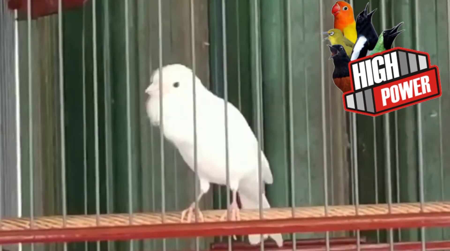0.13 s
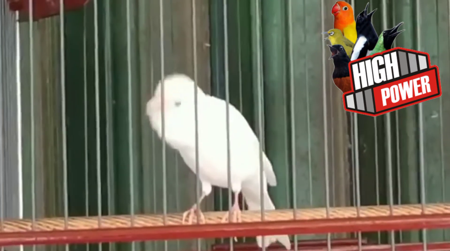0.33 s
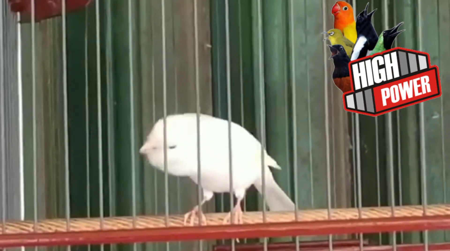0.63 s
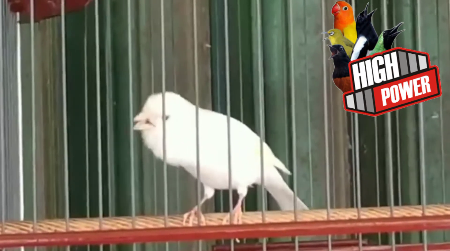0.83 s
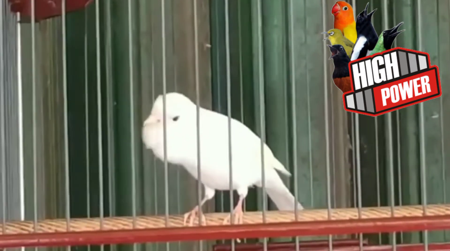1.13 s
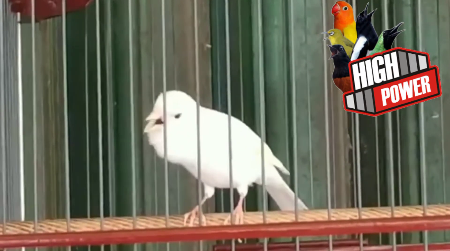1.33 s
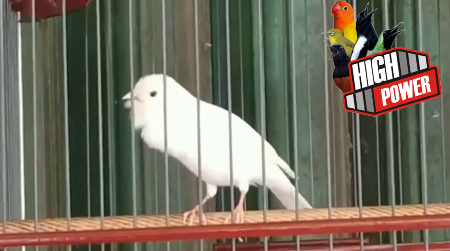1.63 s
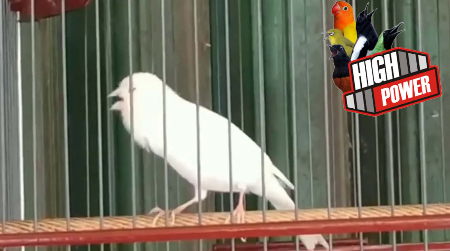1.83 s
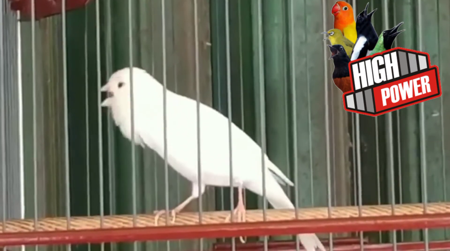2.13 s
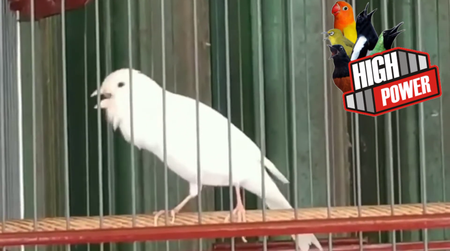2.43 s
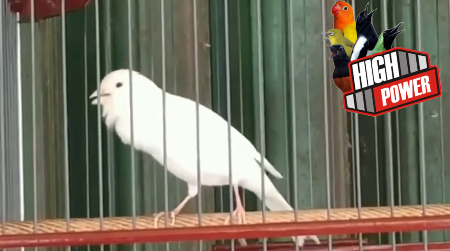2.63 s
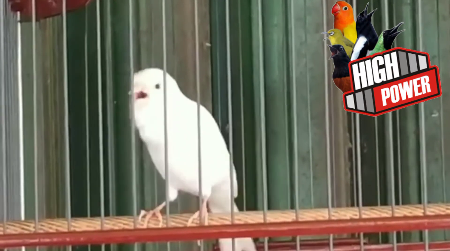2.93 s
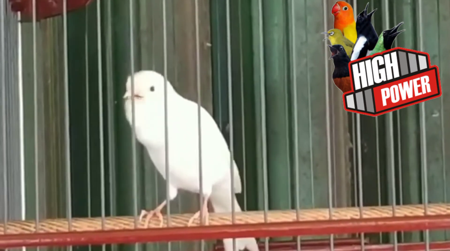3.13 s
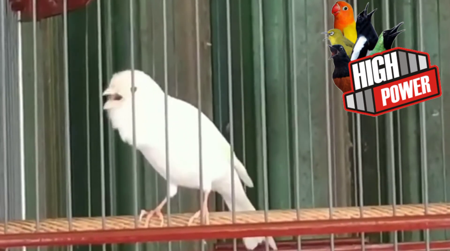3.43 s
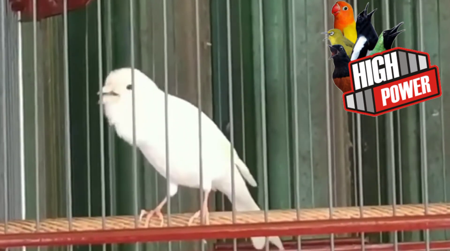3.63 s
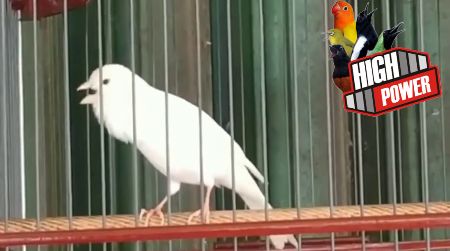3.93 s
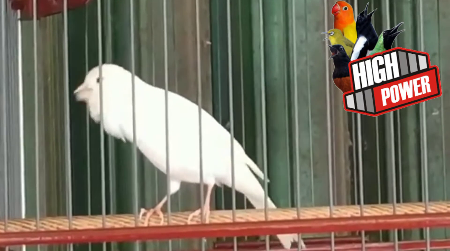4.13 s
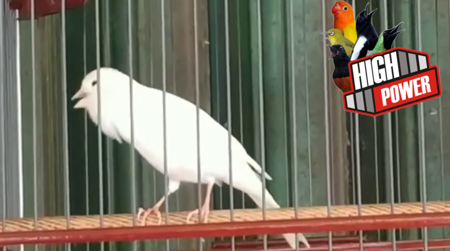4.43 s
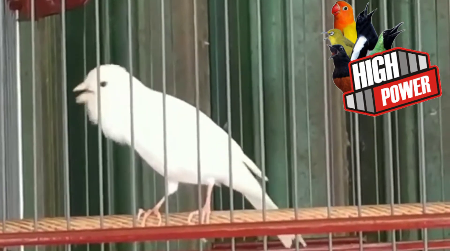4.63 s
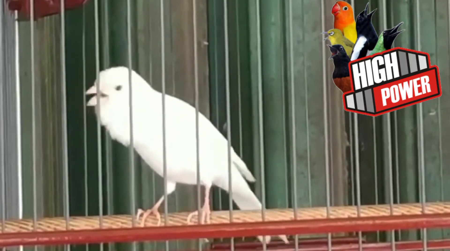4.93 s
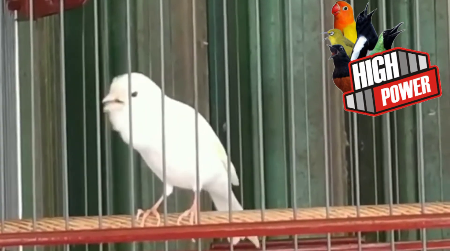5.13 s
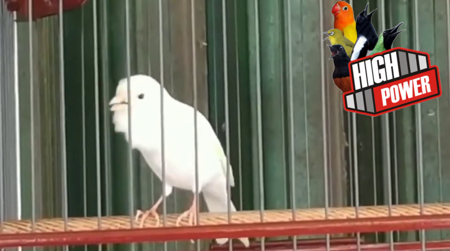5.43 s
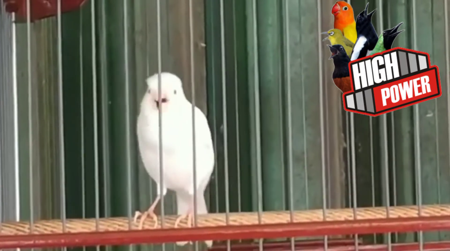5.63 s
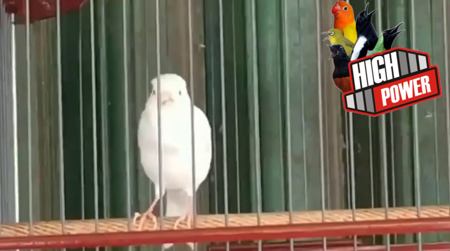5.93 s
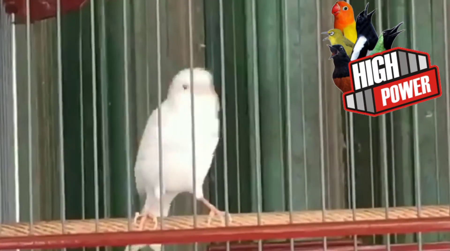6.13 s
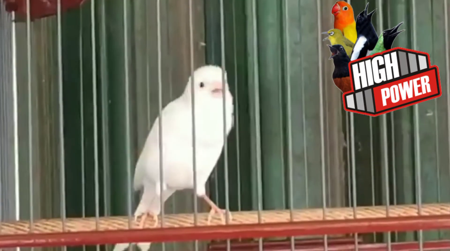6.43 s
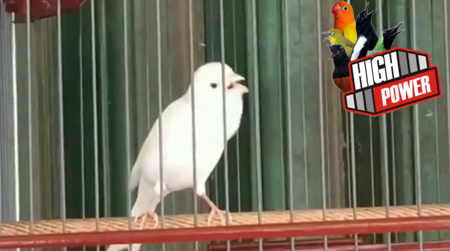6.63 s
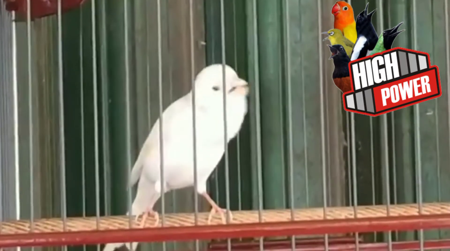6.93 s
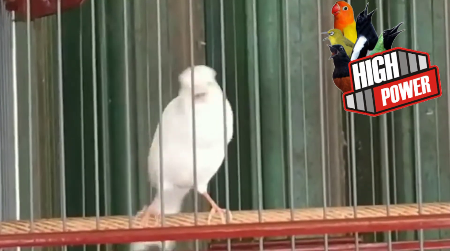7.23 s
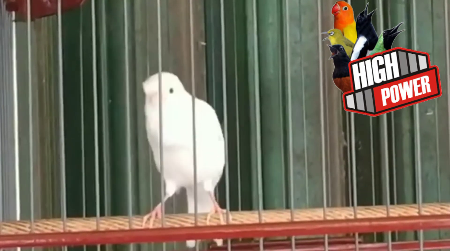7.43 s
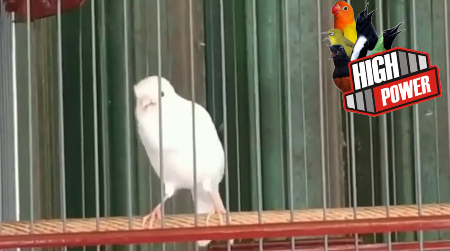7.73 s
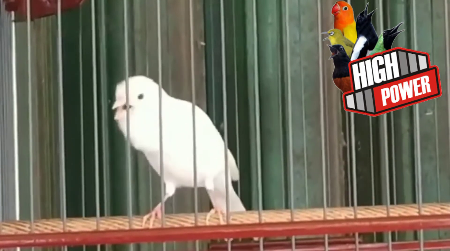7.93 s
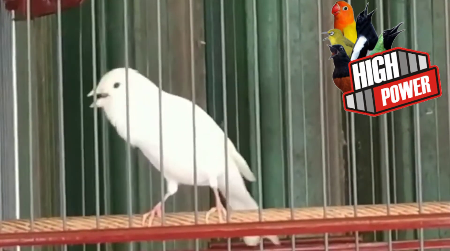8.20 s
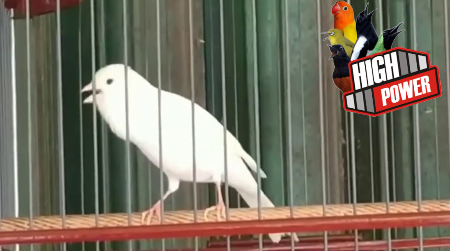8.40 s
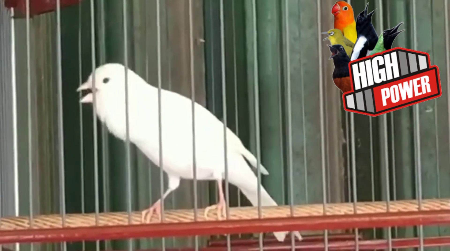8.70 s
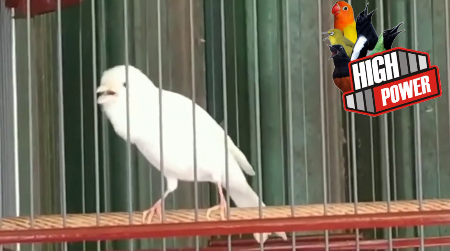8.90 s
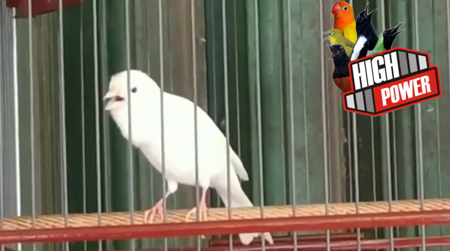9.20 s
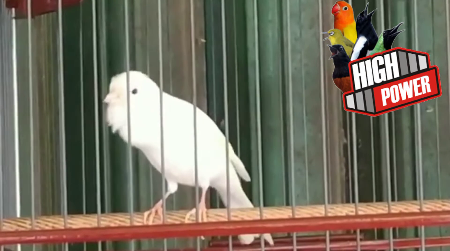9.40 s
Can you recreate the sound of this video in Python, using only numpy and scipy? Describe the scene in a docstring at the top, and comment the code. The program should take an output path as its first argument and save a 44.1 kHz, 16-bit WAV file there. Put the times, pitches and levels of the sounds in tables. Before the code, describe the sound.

A canary sings loudly nonstop close by in a ringing hard-walled room, shifting from falling whistles to buzzy trills and fast chips.

```python
"""Caged canary in a hard-walled room

A canary sings in a wire cage close to two microphones. Its song is a chain of tours: each repeats one syllable,
a nearly pure tone that the syrinx bends in pitch, with overtones and a rasp on rough notes.
Close walls answer each sweep with discrete echoes; decaying noise responses make the room ring on.
A second bird whistles gliding tones further off, over filtered-noise rumble and low engine hums."""
import sys
import numpy as np
from scipy import signal
from scipy.fft import rfft, irfft
from scipy.io import wavfile
from scipy.ndimage import uniform_filter1d, minimum_filter1d

SR = 44100
rng = np.random.default_rng(int(sys.argv[2]) if len(sys.argv) > 2 else 0)


def dump(signal):
    """Clip the signal to [-1, 1] and save it as 16-bit WAV at the path in sys.argv[1]."""
    limited = np.clip(np.atleast_2d(signal).T, -1, 1)
    pcm = np.round(limited * 32767).astype(np.int16)
    wavfile.write(sys.argv[1], SR, pcm)


N = 421596
TIME = np.arange(N) / SR  # s


def undb(db):
    """Decibels to amplitude gain."""
    return 10 ** (np.asarray(db) / 20)


def colour(x, points):
    """Filter by a spectrum of (f/Hz, gain/dB) points, linear in dB over log frequency."""
    hz, db = np.transpose(points)
    bins_hz = np.maximum(np.arange(N // 2 + 1) * SR / N, 1)
    gain = undb(np.interp(np.log(bins_hz), np.log(hz), db))
    return irfft(rfft(x) * gain, N)


def wander(cutoff_hz):
    """Low-passed noise of unit spread: a smooth random curve."""
    lowpass = signal.butter(2, min(cutoff_hz, SR / 4), fs=SR, output="sos")
    x = signal.sosfilt(lowpass, rng.standard_normal(N))
    return x / x.std()


# Rumble and air spectrum, relative: [f/Hz, level/dB]
RUMBLE_SPECTRUM = [(20, -6), (35, 1.5), (70, -1.5), (115, 1), (170, -1.5), (240, -11), (400, -16),
                   (800, -20), (1600, -23), (4000, -17), (13000, -41)]
# Rumble loudness over time, before trim_db: [t/s, level/dB]
RUMBLE_LEVEL = [(0, -38.5), (1.5, -39), (3.8, -39.5), (5.6, -39), (7, -41.5), (8.3, -45), (9.56, -42.5)]


def background(wide_hz=400, trim_db=1.5):
    """Low rumble, alike on both sides, that thins into diffuse air noise above wide_hz."""
    mid = colour(rng.standard_normal(N), RUMBLE_SPECTRUM) * undb(.8 * wander(6))
    side = colour(rng.standard_normal(N), RUMBLE_SPECTRUM)
    highpass = signal.butter(1, wide_hz, "high", fs=SR, output="sos")
    side = signal.sosfilt(highpass, side)
    level_db = np.interp(TIME, *np.transpose(RUMBLE_LEVEL)) + trim_db
    return np.array([mid + side, mid - side]) / mid.std() * undb(level_db)


# Distant engine hums, before waver and drift: [start t/s, length/s, first f/Hz, last f/Hz, level/dB]
ENGINE_HUMS = [(-.1, 0.95, 100.3, 97.7, -38.5), (0.103, 1.15, 112, 121.1, -35.5),
               (1.25, 1.06, 117, 115.8, -37.5), (1.296, 1.3, 58.2, 65.4, -44),
               (3.208, 1.38, 170.4, 168, -39.5), (3.705, 1.236, 83.8, 87.9, -37.5),
               (4.997, 0.99, 149.6, 139.6, -38.5), (6.193, 1.95, 95.9, 98.94, -41.5)]


def engines(waver_db=2.0, drift=0.013):
    """Low gliding sines that swell and fade outside, unsteady in pitch and level."""
    out = np.zeros(N)
    unsteady = 1 + drift * wander(5.1)
    loudness = undb(waver_db * wander(3.4))
    for start, length, first_hz, last_hz, db in ENGINE_HUMS:
        u = np.clip((TIME - start) / length, 0, 1)
        hz = (first_hz + (last_hz - first_hz) * u) * unsteady
        envelope = np.sqrt(np.abs(np.sin(np.pi * u)))
        out += undb(db) * envelope * np.sin(2 * np.pi * np.cumsum(hz) / SR)
    return out * loudness


def room(x, t60_s, db, build_s=.006, treble_hz=6000, treble_share=0.48):
    """Diffuse tail of decaying noise, different at each microphone; the treble dies sooner."""
    t = TIME[:SR]
    noise = rng.standard_normal((2, SR))
    lowpass = signal.butter(2, min(treble_hz, SR / 3), fs=SR, output="sos")
    low = signal.sosfiltfilt(lowpass, noise)
    decay = np.exp(-np.log(1000) * t / t60_s)
    response = low * decay + (noise - low) * decay ** (1 / treble_share)
    response *= 1 - np.exp(-t / build_s)
    response /= np.sqrt(np.sum(response ** 2, axis=1, keepdims=True))  # unit energy
    return undb(db) * signal.fftconvolve(x[None], response, axes=1)[:, :N]


def turning(x, t60_s, db, build_s, count=3):
    """As the bird turns its head it lights different walls: drift between several room responses."""
    shares = np.array([undb(9 * wander(3)) for _ in range(count)])
    shares /= np.sqrt(np.sum(shares ** 2, axis=0))
    return sum(room(x * share, t60_s, db, build_s) for share in shares)


def close_walls(x, echoes, lag_ms, sway_ms=0.1136):
    """Direct sound plus first echoes, whose paths change as the bird sways; they beat against each sweep."""
    out = np.interp(TIME - lag_ms / 1000, TIME, x)
    for ms, db in echoes:
        delay_s = (ms + sway_ms * wander(2)) / 1000
        out += undb(db) * np.interp(TIME - delay_s, TIME, x)
    return out


# Far whistles, before pitch waver: [start t/s, length/s, first f/Hz, last f/Hz, level/dB]
FAR_CALLS = [(2.175, 0.21, 4330, 5080, -19), (3.721, 0.15, 2910, 3476, -29), (3.978, 0.2, 2930, 3450, -30),
             (7.755, 0.16, 3840, 4073, -20.5), (8.004, 0.16, 3450, 3760, -21.5),
             (8.26, 0.16, 3360, 3760, -20.5), (8.433, 0.12, 3655, 2900, -30.5),
             (8.73, 0.16, 3600, 3170, -25), (8.985, 0.18, 4180, 5020, -19)]


def far_bird(waver=0.0199):
    """Soft, slightly unsteady whistles that glide quickly at first and level off."""
    out = np.zeros(N)
    unsteady = 1 + waver * wander(95)
    for start, length, first_hz, last_hz, db in FAR_CALLS:
        span = slice(*np.searchsorted(TIME, [start, start + length]))
        u = (TIME[span] - start) / length
        hz = (last_hz + (first_hz - last_hz) * (1 - u) ** 2) * unsteady[span]
        envelope = np.sqrt(np.abs(np.sin(np.pi * u)))
        out[span] += undb(db) * envelope * np.sin(2 * np.pi * np.cumsum(hz) / SR)
    return out


RASP_FROM_HZ, RASP_SPAN_HZ = 5400, 1190  # the voice turns hoarse across this range
SCATTER_PITCH, SCATTER_DB = .004, 0.16  # syllable-to-syllable spread
# Throat gain by pitch: [f/Hz, level/dB]
THROAT_GAIN = [(1800, -5), (2500, -15.5), (3000, -11), (3400, -4.5), (3850, 0.5), (4300, -2.5), (5200, 1.5),
               (5800, -5), (6500, -9.5), (7500, -12)]


def tour(stroke, beats_s, lengths=1, pitches=1, accents_db=0, db=0, attack_ms=5, release_ms=8, swell_db=0,
         rough=0, rasp=0, slowing_per_s=0, sag_per_s=0, tiring_db_per_s=0):
    """Repeat a stroke on each beat, drifting in length, pitch and effort.

    Returns pitch times pressure, pressure, roughness times pressure."""
    stroke_ms, stroke_hz = np.transpose(stroke)
    chance = rng.standard_normal((len(beats_s), 2))
    into_tour_s = np.asarray(beats_s) - np.mean(beats_s)
    lengths = lengths * (1 + slowing_per_s * into_tour_s)
    pitches = pitches * (1 - sag_per_s * into_tour_s + SCATTER_PITCH * chance[:, 0])
    efforts_db = db + accents_db - tiring_db_per_s * into_tour_s + SCATTER_DB * chance[:, 1]
    controls = np.zeros((3, N))
    for beat, length, pitch, effort_db in zip(beats_s, lengths, pitches, efforts_db):
        span = slice(*np.searchsorted(TIME, beat + length * stroke_ms[[0, -1]] / 1000))
        t_ms = (TIME[span] - beat) * 1000 / length  # stroke time, before stretching
        hz = pitch * np.interp(t_ms, stroke_ms, stroke_hz)
        attack = np.clip((t_ms - stroke_ms[0]) / attack_ms, 0, 1)
        release = np.clip((stroke_ms[-1] - t_ms) / release_ms, 0, 1)
        swell = swell_db * np.linspace(-.5, .5, len(hz))
        throat_db = np.interp(hz, *np.transpose(THROAT_GAIN))
        pressure = attack * release * undb(effort_db + swell + throat_db)
        hoarse = rough + rasp * np.clip((hz - RASP_FROM_HZ) / RASP_SPAN_HZ, 0, 1)
        controls[:, span] += pressure * np.array([hz, np.ones(len(hz)), hoarse])
    return controls


# Slur strokes, hoarse high and cleaner low: [t/ms from beat, f/Hz]
SLUR_HIGH = [(-38, 5800), (-30, 7300), (-6, 5200)]
SLUR_LOW = [(-4, 5150), (27, 3950), (64, 2650), (70, 2100)]
# Slur beats: [t/s]
SLUR_BEATS = [.028, .188, .341, .5, .663, .812, .967]


def slur_tour():
    """Opening slurs: the two sides of the syrinx alternate a hoarse high stroke and a clean low one."""
    high = tour(SLUR_HIGH, SLUR_BEATS, db=-11.5, attack_ms=3.3, release_ms=6.8, rough=0.77)
    low = tour(SLUR_LOW, SLUR_BEATS, db=-6.5, attack_ms=3.6, release_ms=4.6, swell_db=-2.5, rough=.1,
               slowing_per_s=-.15, sag_per_s=0.00497, tiring_db_per_s=0.5)
    return high + low


# Falling stroke: [t/ms from beat, f/Hz]
SWEEP_STROKE = [(-14, 7650), (0, 7480), (32, 7020), (96, 5800), (176, 4170), (192, 3150), (204, 2700)]
# Sweep syllables: [beat t/s, length factor, pitch factor, level/dB]
SWEEP_SYLLABLES = [(1.093, .78, 1.0, -1), (1.333, 0.89, 0.99, -0.5), (1.587, 0.96, .99, -1.7),
                   (1.86, 0.97, 0.98, -1.6), (2.129, 1.048, 0.98, -2.1), (8.482, .97, 0.97, .3),
                   (8.744, 1.05, 0.96, .3), (9.02, 1.057, 0.95, 0.1), (9.305, 1.023, .96, 0.4)]


def sweep_tours():
    """Long falling sweeps in two runs: one syringeal stroke per beat."""
    return tour(SWEEP_STROKE, *np.transpose(SWEEP_SYLLABLES), db=-6.5, attack_ms=5, release_ms=4.7,
                swell_db=-1, rough=0.12)


# Rising stroke: [t/ms from beat, f/Hz]
RISE_STROKE = [(-12.5, 2000), (-1, 2720), (15, 3300), (50.5, 4050), (116, 5080), (140, 5200), (208, 5340)]
# Rise syllables: [beat t/s, length factor]
RISE_SYLLABLES = [(2.431, 1.0), (2.727, 1.06)]


def rise_tour():
    """Slow rises: pitch climbs as pressure swells."""
    return tour(RISE_STROKE, *np.transpose(RISE_SYLLABLES), db=-11.0, attack_ms=12, release_ms=15.4,
                swell_db=9.5, rough=0.0077)


# Up-then-down stroke: [t/ms from beat, f/Hz]
SWOOP_STROKE = [(-2.5, 5500), (4, 7450), (24, 6700), (50.5, 5220), (75, 4170), (111, 3330), (198, 2250)]
# Swoop syllables: [beat t/s, length factor]
SWOOP_SYLLABLES = [(3.007, 0.97), (3.265, .93), (3.507, 0.96), (3.758, 0.99), (4.01, .98), (4.274, 0.97)]


def swoop_tour():
    """Slow swoops: a quick rise into a long fall, raspy at the top."""
    return tour(SWOOP_STROKE, *np.transpose(SWOOP_SYLLABLES), db=-8.5, attack_ms=1.85, release_ms=26,
                swell_db=-2.5, rough=0.037, rasp=0.47)


# Hoarse lead-in, high and low trill strokes: [t/ms from beat, f/Hz]
LEAD_IN_STROKE = [(0, 6200), (10, 7300), (58, 6800), (76, 5230)]
TRILL_HIGH = [(-39, 7450), (-29.5, 6500), (-9.5, 4450)]
TRILL_PIP = [(-4, 3230), (1.5, 3540), (9.5, 3740)]
# Lead-in and trill beats: [t/s]
LEAD_IN_BEATS = [4.526]
TRILL_BEATS = [4.612, 4.691, 4.769, 4.846, 4.921, 4.997, 5.075, 5.155, 5.231, 5.309, 5.388, 5.469, 5.552,
               5.631, 5.715]


def trill_tour():
    """A hoarse note, then fast alternation of a rough high stroke and a clean low pip."""
    lead_in = tour(LEAD_IN_STROKE, LEAD_IN_BEATS, db=-8.0, attack_ms=6.4, release_ms=9.4, swell_db=-1,
                   rough=.8)
    high = tour(TRILL_HIGH, TRILL_BEATS[1:], db=-7, attack_ms=1.1, release_ms=2.9, rough=0.34, rasp=0.09,
                slowing_per_s=.14, tiring_db_per_s=-2.5)
    pip = tour(TRILL_PIP, TRILL_BEATS, db=-1.9, attack_ms=3.84, release_ms=7.4, rough=0.048,
               slowing_per_s=-.15, sag_per_s=0.0353, tiring_db_per_s=0)
    return lead_in + high + pip


# Chip strokes, in order: [t/ms from beat, f/Hz]
CHIP_HIGH = [(-31, 5600), (-24, 7300), (-16, 7150), (-2, 5600)]
CHIP_LOW = [(-2, 5550), (10, 4750), (21, 4150), (27, 3800)]
CHIP_TAIL = [(33, 3400), (40, 2900), (49, 1950)]
# Chip beats: [t/s]
CHIP_BEATS = [5.779, 5.883, 5.994, 6.105, 6.213, 6.324, 6.43, 6.543, 6.651, 6.764, 6.875, 6.984, 7.095]


def chip_tour():
    """Fast chips: a hoarse high stroke, a cleaner fall and a short falling tail."""
    high = tour(CHIP_HIGH, CHIP_BEATS, db=-6, attack_ms=0.89, release_ms=11.6, rough=0.704)
    low = tour(CHIP_LOW, CHIP_BEATS, db=-8.0, attack_ms=4.2, release_ms=6.6, swell_db=-12, rough=0.19,
               slowing_per_s=-.08, sag_per_s=0.01526)
    tail = tour(CHIP_TAIL, CHIP_BEATS, db=-6.5, attack_ms=5.6, release_ms=7.2, rough=0.35)
    return high + low + tail


# Chop strokes: [t/ms from beat, f/Hz]
CHOP_HIGH = [(-38.5, 4600), (-27, 7200), (-17.5, 6600), (-6, 5400)]
CHOP_LOW = [(-12, 5900), (0, 5050), (21, 3700), (35, 2950), (60, 1800)]
# Chop beats: [t/s]
CHOP_BEATS = [7.211, 7.346, 7.486, 7.628, 7.767, 7.909, 8.06, 8.193]


def chop_tour():
    """Chops: a hoarse high stroke runs into a cleaner fall that weakens."""
    high = tour(CHOP_HIGH, CHOP_BEATS, db=-12.5, attack_ms=3.6, release_ms=5.4, rough=0.734)
    low = tour(CHOP_LOW, CHOP_BEATS, db=-8.5, attack_ms=10.7, release_ms=23.6, swell_db=-10, rough=0.18,
               rasp=0.21, sag_per_s=0.01102, tiring_db_per_s=2.5)
    return high + low


# Link stroke: [t/ms from beat, f/Hz]
LINK_STROKE = [(-8.5, 6800), (0.5, 8300), (24, 6650), (45.5, 6500), (60.5, 6100), (71.5, 4050)]
# Link beat: [t/s]
LINK_BEATS = [8.33]


def link_note():
    """The short hoarse fall that leads back to the sweeps."""
    return tour(LINK_STROKE, LINK_BEATS, db=-4.5, attack_ms=6.3, release_ms=6.1, rough=0.312)


def syrinx(controls, jitter=0.0541, shimmer=1.0, waver=0.004045, second_db=-25, third_db=-31, fourth_db=-37,
           richness=1.0, air_db=-21):
    """A near sine, richer in overtones on low notes; uneven labia flutter it into a rasp."""
    pressure = controls[1]
    hz, rough = controls[[0, 2]] / (pressure + 1e-9)
    unsteady = 1 + waver * wander(39.2) + jitter * rough * wander(930)
    phase = 2 * np.pi * np.cumsum(hz * unsteady) / SR
    tone = np.sin(phase)
    overtones = (4500 / np.maximum(hz, 3000)) ** richness  # unity at 4500 Hz
    for k, db in enumerate([second_db, third_db, fourth_db], 2):
        below_nyquist = np.clip((SR / 2 - k * hz) / 2000, 0, 1)
        # the moving beak and throat make each overtone come and go
        gain = undb(db + 4.4 * wander(61))
        tone += overtones * below_nyquist * gain * np.sin(k * phase)
    # turbulent air hisses above the tone, most on low and rough notes
    air = colour(rng.standard_normal(N), [(3000, -15), (7000, 2.5), (10000, 5), (12500, -2.0)])
    tone += undb(air_db) * overtones * np.sqrt(np.abs(rough)) * air
    flutter = 1 + np.tanh(shimmer * rough * wander(720))
    return tone * pressure * flutter


def canary():
    """The whole song: pitch, pressure and roughness of every tour drive one syrinx."""
    slow = sweep_tours() + rise_tour() + swoop_tour()
    fast = slur_tour() + trill_tour() + chip_tour() + chop_tour()
    return syrinx(slow + fast + link_note())


# Echoes from the cage tray and close walls, per microphone: [delay t/ms, level/dB]
ECHOES_LEFT = [(1.3, -22), (3.401, -12), (9.7, -7)]
ECHOES_RIGHT = [(1.7, -6.5), (4.2, -7.5), (7.3, -28), (11.2, -37)]
# Colour of the late ring: [f/Hz, level/dB]
ROOM_COLOUR = [(2500, 0), (3100, -.5), (3580, -7), (4200, -.5), (5500, .5), (7200, 1), (11000, 2)]
# Colour of each microphone, birds only: [f/Hz, level/dB]
MIC_LEFT = [(1500, 0), (3000, 0), (5000, -3), (6500, -2), (7550, 3), (8100, -84), (8600, 0.5), (9500, 7),
            (10700, 13.5), (13000, 5)]
MIC_RIGHT = [(1500, -2), (3000, -0.5), (4200, -4), (5300, -6.5), (6200, -4), (7000, -11), (7550, -8.5),
             (8100, -13.5), (9500, -5), (10700, 1.5), (13000, -5.5)]


def scene():
    """Both birds in the room, heard by two microphones, with the background."""
    bed = background() + engines()
    far, near = far_bird(), canary()
    birds = np.array([close_walls(near, ECHOES_LEFT, lag_ms=0.042),
                      close_walls(near, ECHOES_RIGHT, lag_ms=0)])
    # cage bars and nearby walls scatter a quick cloud of echoes; the room rings on behind it
    birds += turning(near, t60_s=.13, db=-4.5, build_s=.002)
    birds += turning(colour(near, ROOM_COLOUR), t60_s=.62, db=-5, build_s=.008)
    # the far bird arrives mostly by way of the walls
    birds += room(far, t60_s=.45, db=1, build_s=.003) + undb(-12) * far
    return np.array([colour(birds[0], MIC_LEFT), colour(birds[1], MIC_RIGHT)]) + bed


TOP_HZ = 13300


def record(dry):
    """A limiter holds the peaks under full scale; the recorder cuts the top above TOP_HZ."""
    gain = np.minimum(1, .94 / (np.abs(dry).max(axis=0) + 1e-9))
    gain = uniform_filter1d(minimum_filter1d(gain, size=220), size=220)  # 5 ms
    lowpass = signal.ellip(10, .2, 80, TOP_HZ, fs=SR, output="sos")
    return signal.sosfilt(lowpass, dry * gain)


dry = scene()
out = record(dry)
dump(out)
```